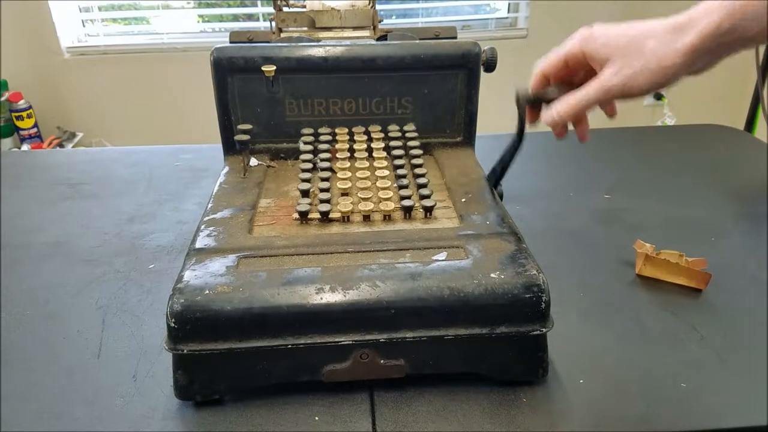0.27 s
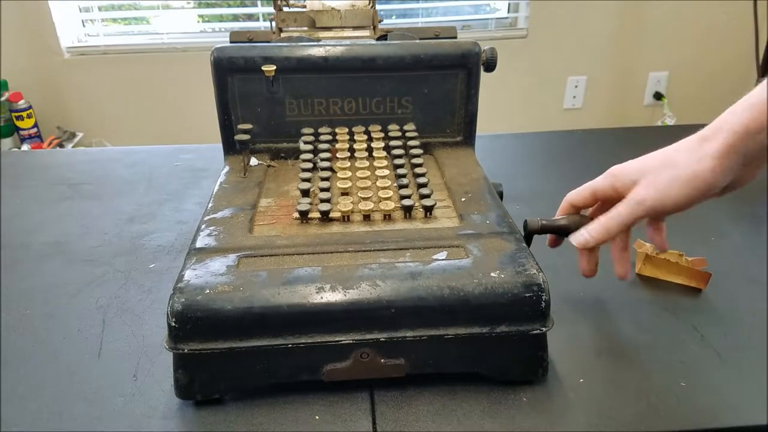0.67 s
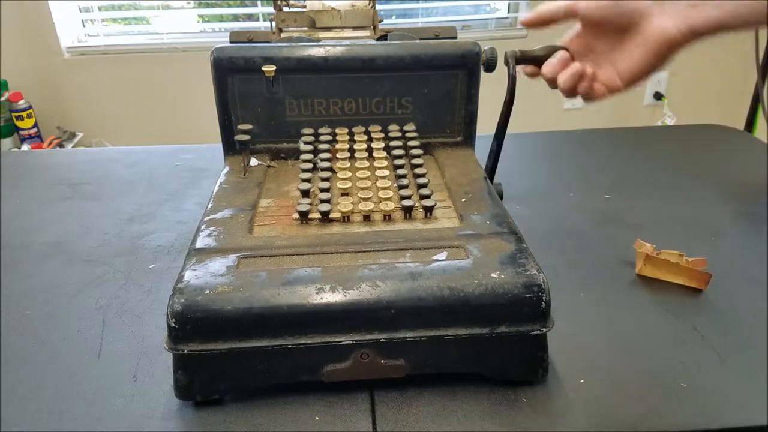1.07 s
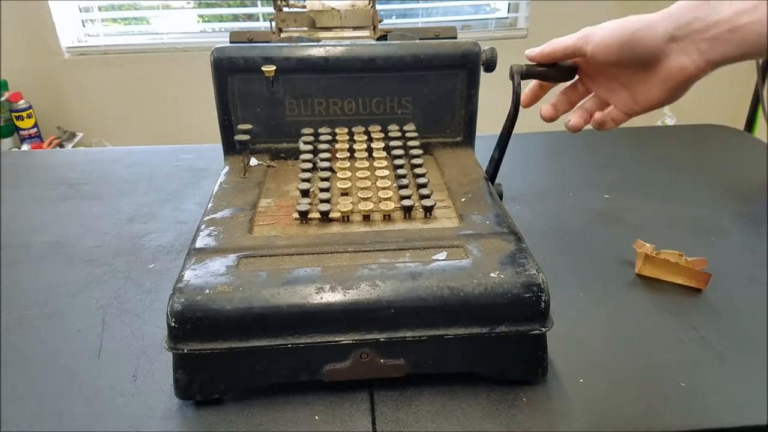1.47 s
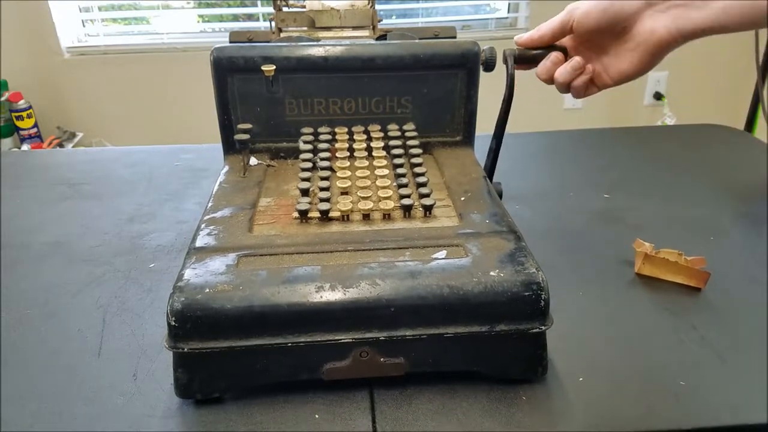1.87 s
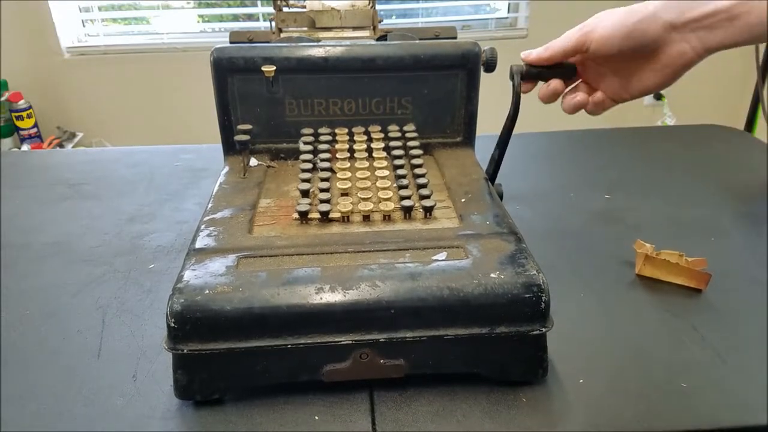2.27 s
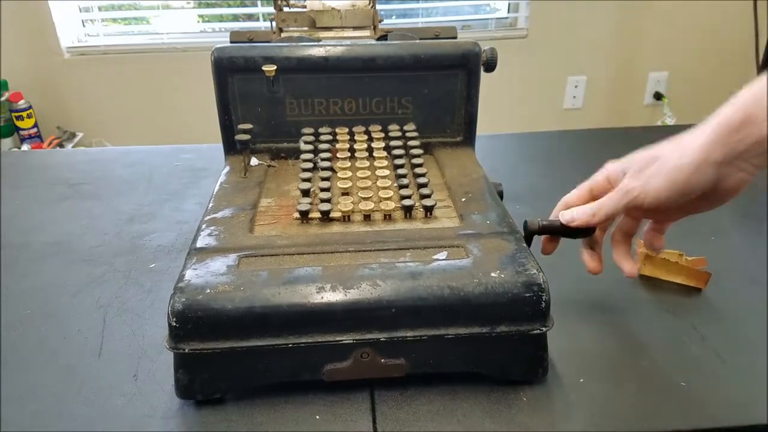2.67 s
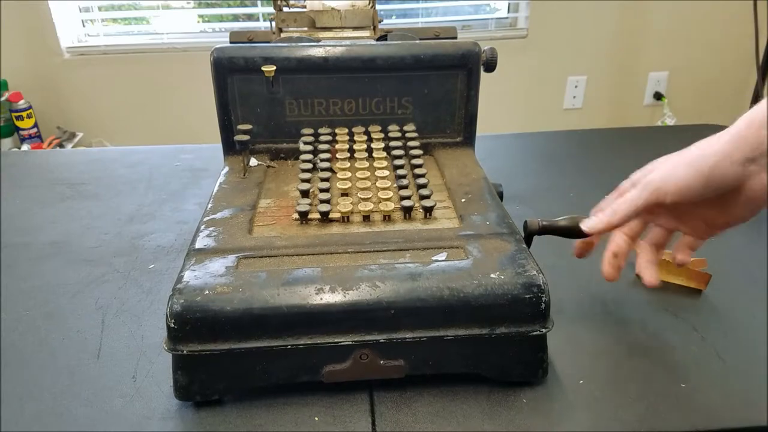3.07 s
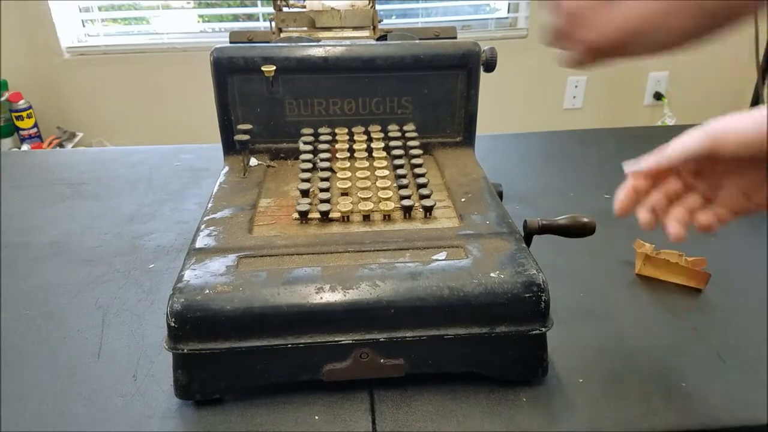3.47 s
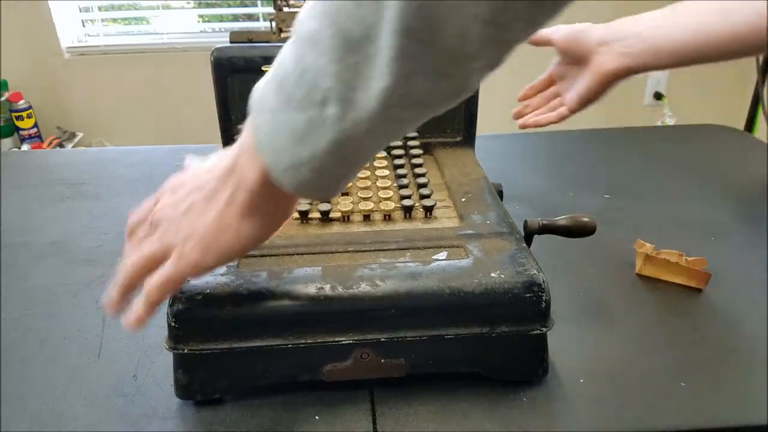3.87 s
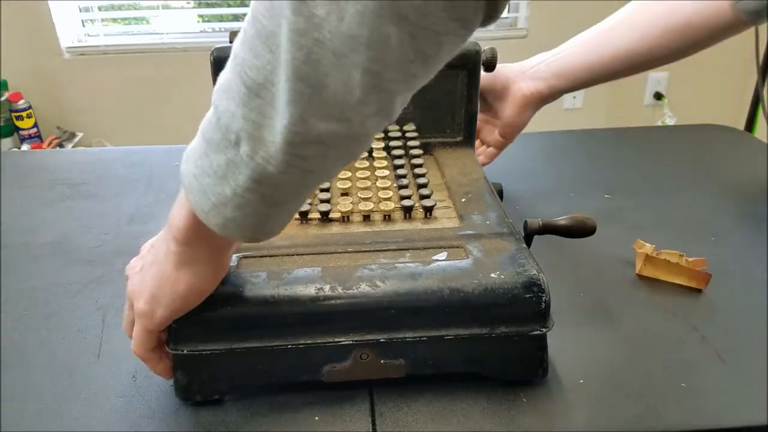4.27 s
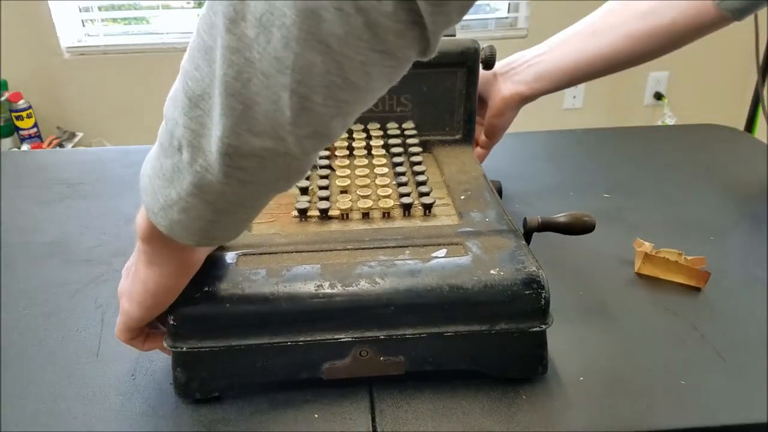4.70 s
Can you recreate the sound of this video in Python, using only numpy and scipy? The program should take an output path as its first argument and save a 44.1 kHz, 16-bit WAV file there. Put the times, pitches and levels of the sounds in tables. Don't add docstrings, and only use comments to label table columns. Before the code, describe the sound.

Heavy iron-cased machine, handle worked twice. Metallic clacks and a ringing latch snap come first, followed by a rattling return and a crisp knock; faint taps and a distant engine revving fill the gap. A second snap with low thuds follows, then near quiet. Finally hands take hold, feet shift and tick on the table. Lively hard-walled room, near stereo microphone, light hiss.

```python
import sys
import numpy as np
from scipy import signal
from scipy.fft import rfft, irfft
from scipy.io import wavfile
from scipy.ndimage import uniform_filter1d

SR = 44100
rng = np.random.default_rng(int(sys.argv[2]) if len(sys.argv) > 2 else 0)


def voltage_ratio(level):
    return 10 ** (np.asarray(level, float) / 20)


def generate_wav(sig):
    pcm = np.round(np.clip(np.atleast_2d(sig).T, -1, 1) * 32767).astype(np.int16)
    wavfile.write(sys.argv[1], SR, pcm)


N = 213419

# pitch in Hz, level in dB, ring time in seconds.
FRAME_MODES = [(916, 1, 0.087), (1180, -5.5, 0.16), (1230, -11.5, 0.036), (1466, 6.5, 0.046)]
TABLE_MODES = [(128, -45.5, 0.13), (148, -23, 0.053), (208.2, 17.5, 0.065), (251, -7, 0.045),
               (265, -4.5, 0.15)]
CASE_MODES = [(316, -7.5, 0.076), (393, -4.5, 0.025), (430, -1, 0.11), (492, 8, 0.095), (514, -8, 0.025),
              (683, -10, 0.13), (762, 8, 0.065)]
LEVER_MODES = [(1810, 2, 0.01), (2104, 16.5, 0.0091), (2320, 3.5, 0.023), (2670, 5, 0.015)]
PIN_MODES = [(5200, -23, .004), (11320, 8.5, 0.021), (12300, 5, 0.011)]
# pitch in Hz, level in dB per Hz.
CROWD = [(100, -4), (145, -10.5), (200, -9.5), (280, -9), (430, -3), (700, -9), (1100, -10), (1600, -9),
         (2200, -6), (3000, -11.5), (4200, -17.5), (5500, -30), (8500, -29.5), (16000, -31.5)]

# start in seconds, blow on the frame in dB,
# weight passed down to the table in dB, softness in dB.
PULLS = [(0.007, -40, -4, 6), (0.211, -36.5, -5, 2), (0.22, -40.5, -5.5, 5), (0.319, -52.5, 2, 18),
         (0.415, -47, -1.5, 8), (0.44, -19, -8.5, -3.5), (0.515, -32, -1.5, 30), (0.545, -28, -8.5, 1),
         (0.824, -35, -1, 1), (0.889, -53, -12, 22), (0.998, -43.5, -35, -9), (1.001, -29.5, -8, -1),
         (1.04, -49.5, 8, 25), (1.079, -37.5, -8.5, 1), (1.098, -49, 9, 10), (1.336, -33.5, -12.5, 6.5),
         (1.682, -41, -3, 6.5), (2.124, -62, 18.5, 6), (2.25, -40.5, -9, 0.5), (2.481, -59, 15.5, 15),
         (2.527, -57, 5.5, -3), (2.564, -51.5, 2, 2), (2.626, -23.5, -12.5, -6), (2.658, -33.5, -9, 0),
         (2.699, -29.5, -19, 23)]
# start in seconds, blow on the frame in dB, weight in dB,
# softness in dB.
GRIPS = [
    (4.09, -49, -1, 20),
    (4.125, -47.5, -8, 16),
    (4.293, -42.5, 3, 5.5),
    (4.309, -47.5, -8, 25),
    (4.348, -53.5, 9, 25),
    (4.445, -61, 8, -10),
    (4.458, -50.5, 17, 2),
    (4.645, -52.5, 12.5, 12),
    (4.779, -44.5, -13.5, 25),
]
# start in seconds, level in dB.
PIN_SNAPS = [(0.007, -60), (0.825, -59), (4.093, -74), (0.415, -52), (0.441, -22.5), (0.515, -51),
             (1.002, -38.5), (2.528, -66), (2.626, -26), (4.444, -60), (4.462, -63)]
# start in
# seconds, length in seconds, level in dB, swell over the stroke in dB, dullness in dB.
RUBS = [(0, .15, -32.5, -14, 12), (0.428, .18, -32, -17, 2), (2.63, 0.23, -38.5, -20.5, -3),
        (0.4, 0.064, -59.5, 10, -6), (0.829, 0.18, -45, 13, 9.5), (1.034, 0.2, -44, -14, 0),
        (2.39, 0.21, -53.5, 0, 14), (2.514, .1, -43, 0, 8.5), (4.084, 0.16, -40.5, -8.5, 7),
        (4.28, 0.17, -41.5, 1.5, 14.5), (4.436, 0.04, -57.5, 11, -8), (4.475, 0.0798, -42, 4.5, -1),
        (4.558, 0.053, -39.5, -2.5, 2), (4.6, 0.27, -53.5, 0, -0.5)]

# time of the blow in seconds, peak in dB.
COVER = [(437, 2, 0.07)], [(.011, -28), (.22, -29.5), (.321, -34.5), (1.688, -35), (2.128, -38),
         (2.256, -36), (2.528, -39.5), (2.566, -46)]
BASE = [(277.2, 0.0091, 0.099)], [(1.038, -36), (1.089, -30), (2.64, -25), (2.70, -34.5), (4.32, -34),
        (4.345, -34), (4.545, -39.5)]
TABLE_TOP = [(142.5, 0.011, .12)], [(.51, -21), (.575, -26), (.66, -34), (2.68, -27.5), (4.54, -37)]
DETENT = [(1960, 0, 0.019)], [(.442, -27.5), (1.688, -37)]
STOP = [(1717, 0.0019, 0.014)], [(.422, -36), (1.004, -39), (1.337, -23)]
FIRST_LATCH = [(6877, -1.5, 0.0624), (6976, -6, 0.042)], [(.442, -30), (1.002, -47)]
SECOND_LATCH = [(2590, 1.5, 0.0047), (6690, -8.5, 0.0054), (6830, -1, 0.0057), (8500, -12, 0.014),
                (8500, -7.5, 0.03), (8400, -10.5, 0.037)], [(2.628, -19.5)]
# start in seconds, pitch in Hz, peak in dB, ring time in seconds.
LONE_RINGS = [
    (0.829, 330, -20, .035),
    (1.082, 2350, -35, .012),
    (2.628, 2550, -20, .008),
    (1.338, 734, -22, 0.011),
    (2.78, 123.7, -40, 0.26),
    (4.093, 4730, -34.5, 0.0055),
    (4.3, 496, -37.5, 0.12),
    (4.461, 510.3, -39, 0.24),
    (4.47, 222, -32, 0.056),
    (4.79, 117, -43.5, 0.31),
]

# start in seconds, peak in dB, centre pitch in Hz,
# low knock in dB.
TICKS = [(4.4459, -47, 6840, -49), (4.4673, -50, 5990, -53), (4.4914, -48, 5610, -41),
         (4.4964, -54, 5100, -36.5), (4.5048, -34.5, 5700, -38), (4.5286, -36.5, 6250, -45),
         (4.543, -41, 13200, -38.5), (4.5506, -33, 8350, -48), (4.5605, -40, 14600, -39),
         (4.5688, -48, 13400, -37.5), (4.758, -55, 13200, -64), (4.774, -42.5, 8200, -60)]
# start in seconds, peak in dB, pitch in Hz.
TAPS = [
    (1.868, -45.5, 790),
    (1.923, -42.5, 945),
]

# pitch in Hz, ring time in seconds.
ROOM_T60 = [(100, 0.12), (260, 0.91), (700, 0.86), (1840, 0.78), (4850, 0.81), (12800, 0.32)]
# pitch in Hz, level in dB.
ROOM_COLOUR = [(60, -11), (150, 1.2), (400, -4), (1200, 0.5), (3000, -2.5), (7000, -0.5), (15000, -0.5)]
# pitch in Hz, likeness from -1 to 1.
LIKENESS = [(60, 0.73), (130, 1), (290, 0.93), (640, 0.31), (1410, -0.023), (3100, 0.038), (6820, 0.014),
            (15000, -0.01)]

# time in seconds, firing rate in Hz, level in dB.
ENGINE = [
    (1.15, 71.3, -64),
    (1.198, 73.3, -70),
    (1.298, 74.5, -64.5),
    (1.754, 78, -53.5),
    (2.022, 81.2, -66),
    (2.142, 82.6, -65),
    (2.308, 85.4, -57),
    (2.434, 91.4, -61.5),
    (2.6, 97, -68),
]
# pitch in Hz, width in Hz, level in dB.
ROOM_MODES = [(63.1, 9, -74), (96.7, 12, -66.5), (142, 57, -62), (255, 10, -81.5), (297.8, 3.5, -71),
              (443, 4.7, -73.5)]
# pitch in Hz, level in dB per Hz.
AIR = [(30, -14), (45, -15.5), (70, -11.5), (120, -15), (200, -12.5), (350, -19.5), (650, -21.5),
       (1400, -23.5), (3000, -33), (6000, -41), (9500, -40.5), (12000, -41), (14500, -37), (16000, -35)]
# pitch in Hz, left minus right in dB.
BALANCE_DB = [(60, 1.5), (110, -2.5), (200, -1), (380, -3.5), (700, -1), (1290, -2), (2380, -2.5),
              (4400, -5), (8120, -3), (15000, 2.5)]


def at_hz(points, hz):
    table = np.array(points)
    return np.interp(np.log(hz), np.log(table[:, 0]), table[:, 1])


def rms_one(x):
    return x / np.sqrt(np.mean(x ** 2) + 1e-20)


def while_on(rows, column):
    rows = np.array(rows)
    gain = voltage_ratio(np.interp(np.arange(N) / SR, rows[:, 0], rows[:, column], -200, -200))
    return uniform_filter1d(gain, size=220)


def ring(force, hz, t60):
    r = voltage_ratio(-60 / (max(t60, .002) * SR))
    w = 2 * np.pi * hz / SR
    return signal.lfilter([0, np.sin(w)], [1, -2 * r * np.cos(w), r * r], force + 1e-18)


def radiate(sound, other, share):
    share = np.clip(share, 0, 1)
    pair = np.sqrt(1 - share) * sound + np.sqrt(share) * other * [[1], [-1]]
    left_lag_s = .0001
    return np.array([np.roll(pair[0], int(left_lag_s * SR)), pair[1]])


def highpass(x, order, hz):
    return signal.sosfilt(signal.butter(order, hz, "high", fs=SR, output="sos"), x)


def bandpass(x, low, high):
    return signal.sosfilt(signal.butter(2, [low, high], "band", fs=SR, output="sos"), x)


def struck(modes, blows, band_hz, mode_db, crowd_db, rise_s, t60, rub, share, dulling):
    s, blow_db = blows
    late = np.sort(rng.random((len(s), 5)), axis=1) * 3 * rise_s
    late[:, 0] = 0
    at = ((s[:, None] + late + .0006) * SR).astype(int)

    clear = 0
    for hz, level_db, mode_t60 in modes:
        force = np.zeros(N)
        uneven_db = 1.5 * rng.standard_normal((len(s), 1))
        sizes = rng.uniform(0.29, 1, at.shape) * rng.choice([-1, 1], at.shape)
        np.add.at(force, at, sizes * voltage_ratio(blow_db[:, None] + level_db + mode_db + uneven_db))
        clear = clear + ring(force, hz, mode_t60)

    swell, fade = np.exp(-1 / (rise_s * SR)), voltage_ratio(-60 / (t60 * SR))
    edges, crowd = np.geomspace(*band_hz, 5), 0
    softness_db = blow_db.max() - blow_db
    for k, (low, high) in enumerate(zip(edges, edges[1:])):
        blow = np.full(N, 1e-18)
        np.add.at(blow, at[:, 0], voltage_ratio(blow_db + crowd_db - dulling * k * softness_db))
        swollen = signal.lfilter([1 - swell], [1, -swell], blow)
        shaking = signal.lfilter([1], [1, -fade], swollen) + rub
        noise = rng.standard_normal((2, N))
        all_round = blow / np.sqrt(1 - fade ** 2) * (-1) ** k + 0.84 * rub * noise[1]
        colour = voltage_ratio(at_hz(CROWD, np.sqrt(low * high)) - at_hz(CROWD, band_hz[0]))
        crowd = crowd + colour * bandpass([*(shaking * noise), all_round], low, high)
    return np.array([*radiate(clear + crowd[0], crowd[1], share), crowd[2] + .3 * clear])


def rubbing(offset_db, dulling, per_s):
    happens = rng.random(N) < per_s / SR
    grains = happens * voltage_ratio(2.5 * np.minimum(rng.exponential(1, N), 4))
    strokes = 0
    for s, length, db, swell_db, dull_db in RUBS:
        curve = while_on([(s, db), (s + length, db + swell_db)], column=1)
        strokes = strokes + voltage_ratio(-dulling * dull_db) * curve
    return rms_one(grains) * voltage_ratio(offset_db) * strokes


def machine():
    dull = rubbing(offset_db=-1.5, dulling=0, per_s=980)
    middle = rubbing(offset_db=-6.5, dulling=1, per_s=700)
    bright = rubbing(offset_db=-12.5, dulling=1.1, per_s=1246)
    s, db, weight_db, soft_db = np.transpose(PULLS + GRIPS)
    pin_blows = np.hstack([[s, db - soft_db - 23], np.transpose(PIN_SNAPS)])
    case_db = db + 2.5 + 0.39 * weight_db

    frame = struck(FRAME_MODES, (s, db), (800, 1600), mode_db=-14.0, crowd_db=12.5,
                   rise_s=0.00107, t60=0.025, rub=middle, share=0.19, dulling=0.031)
    table = struck(TABLE_MODES, (s, db + weight_db), (112, 320), mode_db=-35.5, crowd_db=16.0,
                   rise_s=0.00822, t60=0.16, rub=dull, share=0.013, dulling=0.0089)
    case = struck(CASE_MODES, (s, case_db), (320, 800), mode_db=-14.5, crowd_db=11.5,
                  rise_s=0.00412, t60=0.068, rub=dull, share=0.13, dulling=0.0057)
    levers = struck(LEVER_MODES, (s, db - soft_db), (1600, 4500), mode_db=-14, crowd_db=10.5,
                    rise_s=0.000876, t60=0.029, rub=middle, share=0.25, dulling=0.096)
    pins = struck(PIN_MODES, pin_blows, (4500, 16000), mode_db=-9, crowd_db=13,
                  rise_s=.0005, t60=0.017, rub=bright, share=0.82, dulling=0.049)
    return highpass(frame + table + case + levers + pins, 4, 100)


def latches():
    rings = list(LONE_RINGS)
    for modes, blows in (COVER, BASE, TABLE_TOP, DETENT, STOP, FIRST_LATCH, SECOND_LATCH):
        for s, db in blows:
            rings += [(s, hz, db + level_db, t60) for hz, level_db, t60 in modes]
    out = np.zeros(N)
    for s, hz, peak_db, t60 in rings:
        start = int(s * SR)
        t = np.arange(min(int(2 * t60 * SR), N - start)) / SR
        swell = 1 - np.exp(-t * hz * .8)
        out[start:start + len(t)] += voltage_ratio(peak_db - 60 * t / t60) * swell * np.sin(2 * np.pi * hz * t)
    return radiate(out, np.roll(out, 9), share=.12)


def ticks():
    out, t = np.zeros((2, N)), np.arange(600) / SR
    for s, peak_db, hz, knock_db in TICKS:
        noise = radiate(*rng.standard_normal((2, 600)) * voltage_ratio(-60 * t / 0.0095), share=0.5)
        bright = signal.lfilter([1, -.8], [1], 0.93 * noise + 0.33 * ring(noise, hz, t60=0.0015))
        knock = ring(noise, 1810, t60=0.0041) + 0.47 * ring(noise, 2360, t60=0.0053)
        start = int(s * SR)
        out[:, start:start + 600] += voltage_ratio(peak_db - 4.0) * bright + voltage_ratio(knock_db - 5.5) * knock
    return out


def taps():
    out, t = np.zeros((2, N)), np.arange(600) / SR
    shape = voltage_ratio(-60 * t / 0.0048) * (1 - np.exp(-t / 0.00038))
    for s, peak_db, hz in TAPS:
        start = int(s * SR)
        out[:, start:start + 600] += voltage_ratio(peak_db + 11.5) * np.sin(2 * np.pi * hz * t) * shape
    return out


def diffuse(count, gain_at):
    out, edges = 0, 30 * 2 ** np.arange(0, 9.6, .5)
    white = rng.standard_normal((2, 2, count))
    for k, (low, high) in enumerate(zip(edges, edges[1:])):
        mid, side = bandpass(white[k % 2], low, high)
        hz = np.sqrt(low * high)
        alike = np.clip(at_hz(LIKENESS, hz), -1, 1)
        pair = np.sqrt(1 + alike) * mid + np.sqrt(1 - alike) * side * [[1], [-1]]
        out = out + gain_at(hz) * pair
    return out


def room(x):
    t = np.arange(SR) / SR
    tail = diffuse(SR, lambda hz: voltage_ratio(at_hz(ROOM_COLOUR, hz) - 60 * t / at_hz(ROOM_T60, hz)))
    tail *= 1 - np.exp(-t / 0.002)
    return signal.fftconvolve(x[None], tail, axes=1)[:, :N]


def engine():
    times, rates = np.array(ENGINE)[:, :2].T
    hz = np.interp(np.arange(N) / SR, times, rates)
    return np.sqrt(2) * while_on(ENGINE, 2) * np.sin(2 * np.pi * np.cumsum(hz) / SR)


def background():
    air = voltage_ratio(-62.5) * rms_one(diffuse(N, lambda hz: voltage_ratio(at_hz(AIR, hz))))
    for hz, width_hz, level_db in ROOM_MODES:
        t60 = np.log(1000) / np.pi / width_hz
        air = air + voltage_ratio(level_db) * rms_one(ring(rng.standard_normal(N), hz, t60))
    return air


def scene():
    parts, rings, small = machine(), latches(), ticks() + taps()
    into_room = parts[2] + 0.7 * rings[1] + 0.5 * small[1]
    echo = voltage_ratio(-33.5) * room(into_room)
    return parts[:2] + rings + small + echo + engine() + background()


def roll_off(x):
    return signal.sosfilt(signal.butter(12, 16980, fs=SR, output="sos"), x)


def record(dry):
    hz = np.arange(N // 2 + 1) * SR / N + 1
    tilt = voltage_ratio(at_hz(BALANCE_DB, hz) * [[.5], [-.5]])
    x = irfft(rfft(dry, axis=1) * tilt, N, axis=1)
    x = highpass(x, 3, 61.7)
    x = signal.sosfilt(signal.cheby2(12, 70, 16900, fs=SR, output="sos"), x)
    return roll_off(x)


dry = scene()
out = record(dry)
generate_wav(out)
```